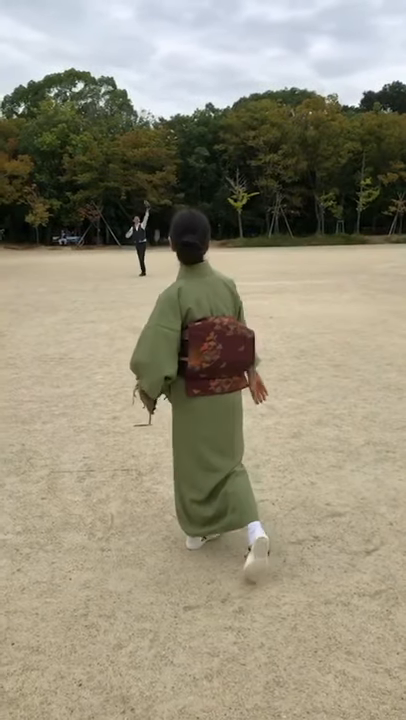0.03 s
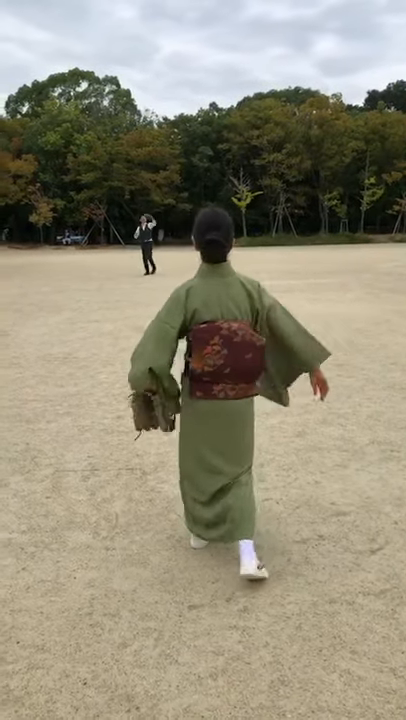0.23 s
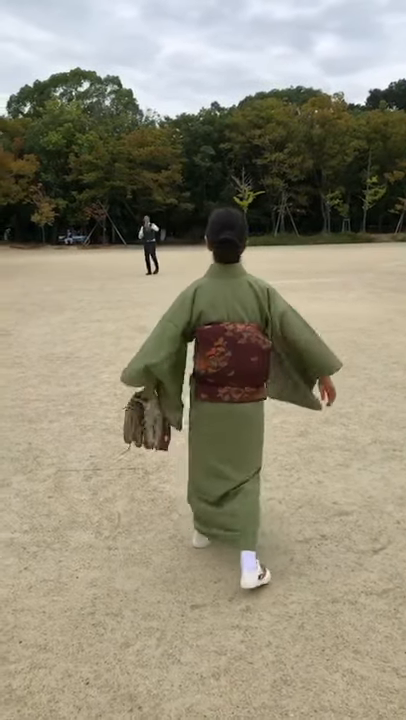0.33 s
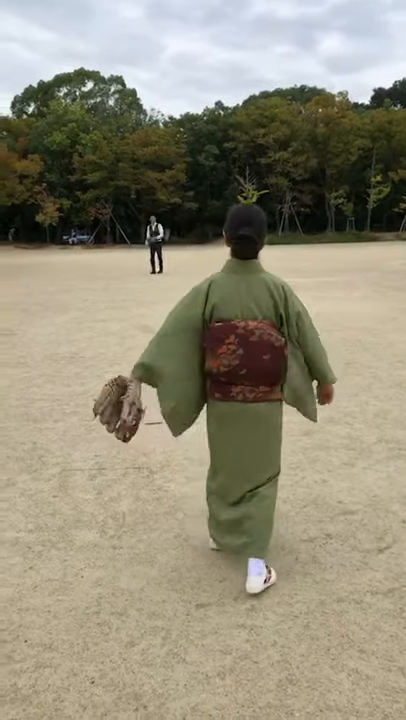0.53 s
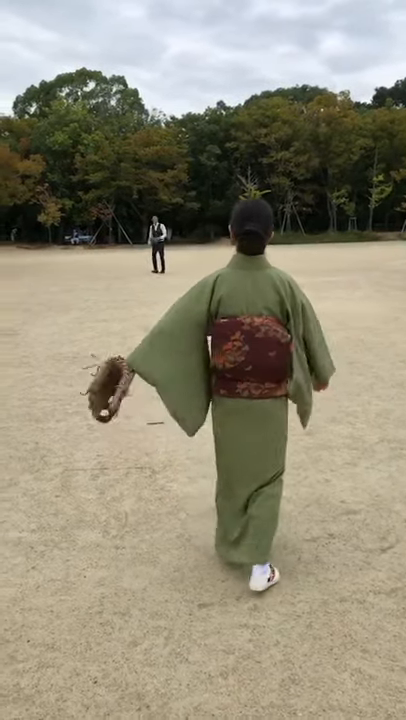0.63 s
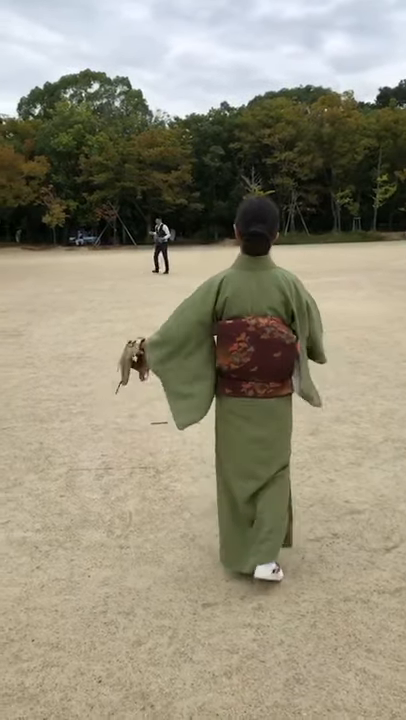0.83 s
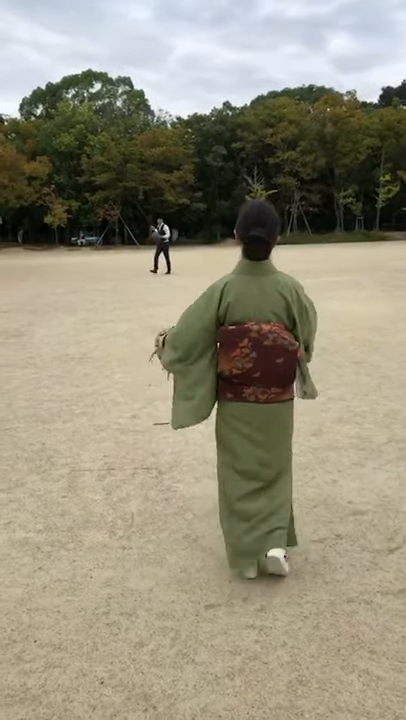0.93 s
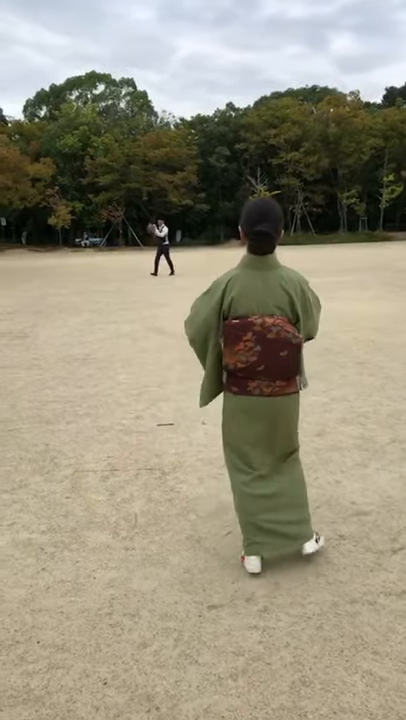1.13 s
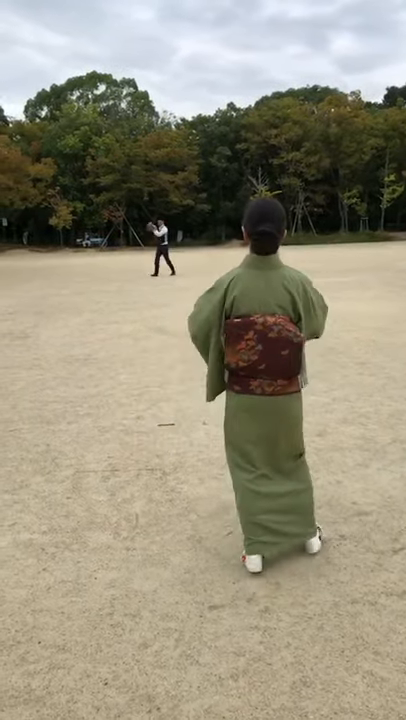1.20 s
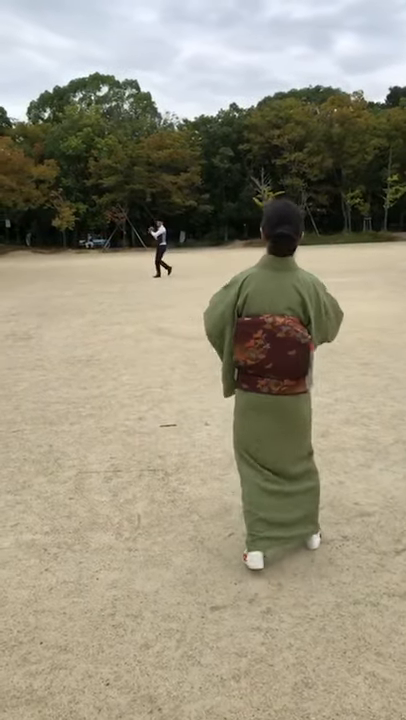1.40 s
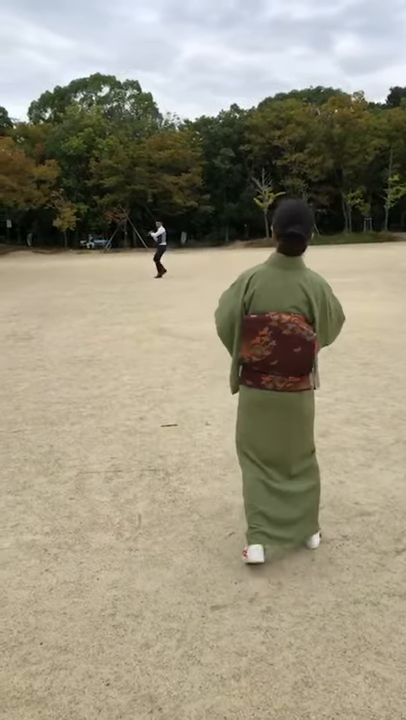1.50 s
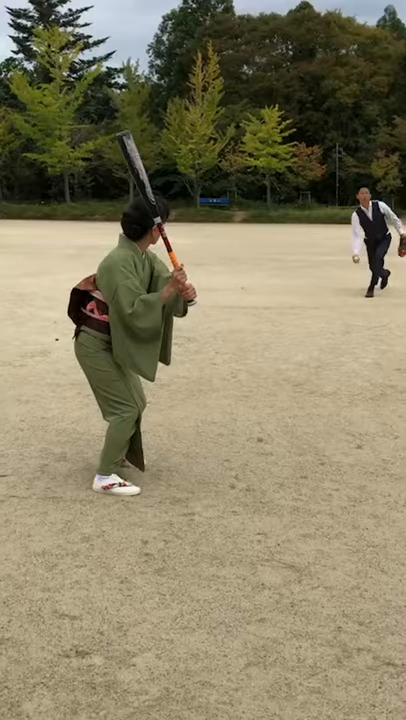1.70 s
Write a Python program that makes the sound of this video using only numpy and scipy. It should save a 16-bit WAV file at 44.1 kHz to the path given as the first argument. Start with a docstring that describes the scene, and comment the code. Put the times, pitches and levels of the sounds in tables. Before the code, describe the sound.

One sharp leather crack sounds as a nearby glove catches a ball on open sandy ground. It echoes faintly, and the catcher walks on with quiet gritty steps and rustling cloth, above a low outdoor rumble.

```python
"""Catch on a sandy field

Open ground, one microphone near the catcher; a low distant rumble and one far bird lie underneath.
A ball smacks into a leather glove: the leather cracks, air in the pocket pops, the padding thuds.
Faint echoes return from the field's edge. The catcher walks on: soles scuff the sand, grit ticks,
sandals and gear knock softly, cloth swishes."""
import sys
import numpy as np
from scipy import signal
from scipy.fft import rfft, irfft
from scipy.io import wavfile

SR = 44100
rng = np.random.default_rng(int(sys.argv[2]) if len(sys.argv) > 2 else 0)


def unload_audio(sound):
    """Save the sound as a 16-bit wav file, at the path given as the first command line argument."""
    columns = np.transpose(np.atleast_2d(sound))
    # keep every value between -1 and 1, then stretch to whole-number steps
    steps = np.round(np.clip(columns, -1, 1) * 32767)
    wavfile.write(sys.argv[1], SR, steps.astype(np.int16))


N = 77175
T = np.arange(N) / SR

CATCH_S, END_S = .2319, 1.71
CRACK_DB, CRACK_LOW_HZ, CRACK_TOP_HZ, CRACK_LEAK_DB = 5.5, 1150, 7780, -26.5
CREASE_DB, CREASE_T60_S = -31.5, 0.019   # the leather crumples just after contact
SIZZLE_DB, SIZZLE_T60_S = -33.5, .011   # the bright top of that crumpling
POCKET_HZ, POCKET_DB, POCKET_DELAY_S = 956, -17, 0.0003
THUD_START_HZ, THUD_END_HZ, THUD_SAG_S = 377, 128.4, 0.0042
THUD_DELAY_S, THUD_RISE_S, THUD_DB, THUD_SHARPNESS = 0.00284, 0.0025, -21.5, 1.4
FIELD_DB, FIELD_T60_S, FIELD_TOP_HZ = -30, 1, 3000   # diffuse scatter
SAND_CENTRE_HZ, GRAINS_PER_S, GRAIN_SPREAD_DB = 3200, 7000, 4
TICK_T60_S, TICK_GRIT = 0.0017, 0.25
BIRD_S, BIRD_DB, BIRD_BLUR_HZ = .685, -66.5, 60
BIRD_START_HZ, BIRD_END_HZ, BIRD_SAG_S = 2840, 2400, 0.052


def from_db(db):
    """Decibels to gain."""
    return 10 ** (np.asarray(db) / 20)


def rms_one(x):
    """Scale to unit rms."""
    return x / np.sqrt(np.mean(x ** 2) + 1e-20)


def cut(x, hz, kind, order=2):
    """Butterworth low- or high-pass."""
    sos = signal.butter(order, min(hz, SR / 2 - 100), kind, fs=SR, output="sos")
    return signal.sosfilt(sos, x + 1e-18)


def bell(x, hz, db, width):
    """Lift or dip one band."""
    b, a = signal.iirpeak(hz, hz / width, fs=SR)
    return x + (from_db(db) - 1) * signal.lfilter(b, a, x)


def colour(x, spectrum, shift=1):
    """Give a noise a spectrum, its frequencies multiplied by shift; rms 1."""
    hz, db = np.transpose(spectrum)
    bins_hz = np.maximum(np.fft.rfftfreq(N, 1 / SR), 1)
    gain = from_db(np.interp(np.log(bins_hz), np.log(hz * shift), db))
    return rms_one(irfft(rfft(x) * gain, N))


def click(s):
    """A unit impulse at s seconds."""
    return 1.0 * (np.arange(N) == int(s * SR))


def dying(s, t60):
    """Sudden start, exponential decay."""
    return (T >= s) * np.exp(-np.log(1000) * np.maximum(T - s, 0) / t60)


def envelope(s, attack, hold, t60):
    """Linear attack, hold, exponential release."""
    release = np.exp(-np.log(1000) * np.maximum(T - s - attack - hold, 0) / t60)
    return np.clip((T - s) / attack, 0, 1) * release


def air(level_db=-49.5):
    """The bed of the open field: steady distant rumble and faint hiss."""
    # spectrum of the outdoor air: f/Hz, relative level/dB
    spectrum = [(20, -46), (32, -27), (45, -5.5), (65, 2), (115, 1.5), (170, 0), (260, -6), (400, -15.5),
                (600, -17.5), (1000, -20), (1600, -27.5), (3000, -30.5), (5500, -32), (9000, -40),
                (15500, -45)]
    return from_db(level_db) * colour(rng.standard_normal(N), spectrum)


def bird():
    """One faint falling whistle, blurred by distance."""
    age = np.maximum(T - BIRD_S, 0)
    hz = BIRD_END_HZ + (BIRD_START_HZ - BIRD_END_HZ) * np.exp(-age / BIRD_SAG_S)
    whistle = np.sin(2 * np.pi * np.cumsum(hz) / SR)
    blur = rms_one(cut(rng.standard_normal(N), BIRD_BLUR_HZ, "low"))
    return from_db(BIRD_DB) * envelope(BIRD_S, attack=.01, hold=0.018, t60=1.1) * blur * whistle


def clothes(centre_hz=9000):
    """The catcher's sleeves and hem brush in smooth, bright swishes."""
    # brushes of cloth: t/s, attack/s, hold/s, t60/s, level/dB, brightness/Hz
    swishes = [(0.125, 0.029, 0.089, 0.12, -65, 5600), (0.154, 0.0045, .012, 0.062, -63, 11000),
               (0.335, 0.01, 0.011, 0.14, -59, 9800), (0.61, 0.024, .04, 1, -77, 10000),
               (1.118, 0.036, 0.0073, 0.051, -63.5, 9000), (1.427, 0.0032, .006, 0.098, -61, 7800),
               (1.438, 0.039, 0.0055, 0.044, -62.5, 9300)]
    # spectrum of a swish of brightness centre_hz: f/Hz, relative level/dB
    cloth = [(1000, -20.5), (4000, -0.5), (9000, 1), (13000, -2.5), (18000, -6)]
    out = np.zeros(N)
    for s, attack, hold, t60, db, hz in swishes:
        rub = colour(rng.standard_normal(N), cloth, hz / centre_hz)
        out += from_db(db) * envelope(s, attack, hold, t60) * rub
    return out


def grains():
    """Sand grains collide: dense random micro-impacts of uneven size."""
    sizes = from_db(GRAIN_SPREAD_DB * np.minimum(rng.exponential(1, N), 5))
    return sizes * rng.choice([-1, 1], N) * (rng.random(N) < GRAINS_PER_S / SR)


def footsteps():
    """Sand crunches under each sole, single grains snap, sandals and gear knock softly."""
    # soles on sand: t/s, attack/s, hold/s, t60/s, level/dB, brightness/Hz
    scuffs = [(0.274, .005, 0.045, 0.15, -63, 4750), (0.326, 0.044, 0.086, 0.46, -56, 3550),
              (0.443, 0.0046, .008, 0.19, -54.5, 2620), (0.512, 0.012, 0.056, 1, -61, 3875),
              (0.644, 0.0031, 0.029, 0.17, -59.5, 3750), (0.796, .02, 0.033, 0.088, -66.5, 4500),
              (0.951, 0.0023, 0.021, 0.038, -50.5, 3200), (0.979, .015, 0.053, 0.15, -60.5, 3000),
              (1.057, 0.0042, .04, 0.16, -60, 3720), (1.309, .001, 0.0021, 0.0052, -53, 3200),
              (1.579, 0.0022, 0.0021, 0.016, -56.5, 2120), (1.592, .02, 0.054, .1, -70, 4500),
              (1.667, 0.007, 0.0035, .015, -54, 2600)]
    # spectrum of a scuff of brightness SAND_CENTRE_HZ: f/Hz, relative level/dB
    sand = [(150, 1), (500, 4), (1000, -2), (1600, -3), (2400, 2), (3500, -1.5), (5200, -4.5), (8000, -11),
            (12000, -21), (16000, -30)]
    # grains snapping underfoot: t/s, level before filtering/dB, f/Hz
    ticks = [(.304, -30, 4960), (0.4537, -25, 4600), (0.661, -33, 6500), (.675, -34, 5500),
             (1.0505, -23, 4100), (1.0685, -28, 3000), (1.1555, -32.5, 7500), (1.256, -32, 3980),
             (1.277, -32, 4000), (1.3106, -22.5, 3000), (1.3563, -28, 4170), (1.658, -36, 7000),
             (1.675, -32.5, 7050)]
    # sandals and handled gear: t/s, f/Hz, level/dB, t60/s
    knocks = [(.291, 1680, -48, .035), (0.955, 110, -49, .04), (.960, 520, -49, 0.049),
              (1.019, 770, -47, 0.041), (1.3095, 2400, -48.5, .014), (1.659, 1150, -39.5, 0.0065),
              (1.672, 290, -36.5, 0.018), (1.675, 950, -43.5, 0.01)]
    out = np.zeros(N)
    for s, attack, hold, t60, db, hz in scuffs:
        crunch = colour(grains(), sand, hz / SAND_CENTRE_HZ)
        out += from_db(db) * envelope(s, attack, hold, t60) * crunch
    for s, db, hz in ticks:
        snap = click(s) + TICK_GRIT * rng.standard_normal(N) * dying(s, TICK_T60_S)
        snap = cut(snap, hz / 2, "high", order=4)
        out += from_db(db) * cut(snap, hz * 1.16, "low")
    for s, hz, db, t60 in knocks:
        out += from_db(db) * dying(s, t60) * np.sin(2 * np.pi * hz * (T - s))
    return out


def scatter(delay, t60):
    """A smeared reflection: decaying noise of unit energy."""
    return rms_one(rng.standard_normal(N) * dying(delay, t60)) / np.sqrt(N)


def field_echoes(x):
    """What the field sends back: a few coloured echoes over a faint, long scatter."""
    # returns from the field's edge: delay/s, level before filtering/dB, t60/s, f/Hz, width/Hz
    echoes = [(.050, 0, 0.12, 505, 109), (.052, -17.5, 0.14, 1730, 450), (0.052, -31, .05, 1100, 700),
              (0.109, -27, 0.054, 1340, 1200), (0.195, -24.5, 0.052, 1410, 1600),
              (0.301, -25, 0.09, 1510, 1610)]
    response = from_db(FIELD_DB) * cut(scatter(0, FIELD_T60_S), FIELD_TOP_HZ, "low")
    for delay, db, t60, hz, width in echoes:
        b, a = signal.iirpeak(hz, hz / width, fs=SR)
        band = signal.lfilter(b, a, scatter(delay, t60) + 1e-18)
        response += from_db(db) * signal.lfilter(b, a, band)   # second pass steepens the band
    return signal.fftconvolve(x, response)[:N]


def leather_crack():
    """The ball strikes the glove: a sharp impulse, then a brief crumpling of the leather."""
    # resonances and one dip of the leather: f/Hz, gain/dB, width/Hz
    leather = [(1150, 4.5, 153), (1820, 2.5, 350), (2270, 2.5, 130), (2700, 3, 110), (3260, 3, 170),
               (3710, -7, 450), (5230, 3.5, 390), (7050, 1.5, 620)]
    crease = from_db(CREASE_DB) * rng.standard_normal(N) * dying(CATCH_S, CREASE_T60_S)
    contact = from_db(CRACK_DB) * click(CATCH_S) + crease
    softened = signal.lfilter(signal.firwin(numtaps=31, cutoff=CRACK_TOP_HZ, fs=SR), 1, contact)
    crack = cut(softened + from_db(CRACK_LEAK_DB) * contact, CRACK_LOW_HZ, "high")
    for hz, db, width in leather:
        crack = bell(crack, hz, db, width)
    sizzle = from_db(SIZZLE_DB) * rng.standard_normal(N) * dying(CATCH_S, SIZZLE_T60_S)
    return crack + sizzle


def pocket_pop():
    """Air trapped in the glove's pocket rings for a few cycles."""
    s = CATCH_S + POCKET_DELAY_S
    ring = -np.sin(2 * np.pi * POCKET_HZ * (T - s))
    return from_db(POCKET_DB) * ring * envelope(s, attack=0.00058, hold=0.0025, t60=0.0047)


def padding_thud():
    """Padding and hand give way: a low thud of sinking pitch."""
    age = np.maximum(T - CATCH_S - THUD_DELAY_S, 0)
    sag_cycles = (THUD_START_HZ - THUD_END_HZ) * THUD_SAG_S * (1 - np.exp(-age / THUD_SAG_S))
    cycles = THUD_END_HZ * age + sag_cycles
    swell = (age / THUD_RISE_S * np.exp(1 - age / THUD_RISE_S)) ** THUD_SHARPNESS
    return from_db(THUD_DB) * swell * np.sin(2 * np.pi * cycles)


def scene():
    """The field in mono, from beside the catcher; only the catch raises echoes."""
    catch = leather_crack() + pocket_pop() + padding_thud()
    return (air() + catch + field_echoes(catch) + footsteps() + clothes() + bird())[None]


def record(dry):
    """The sound stops at END_S; a steep low-pass takes off the highest treble."""
    top_hz = 15450
    low_pass = signal.ellip(10, .1, 80, top_hz, fs=SR, output="sos")
    return signal.sosfilt(low_pass, dry * (T < END_S) + 1e-18)


dry = scene()
out = record(dry)
unload_audio(out)
```